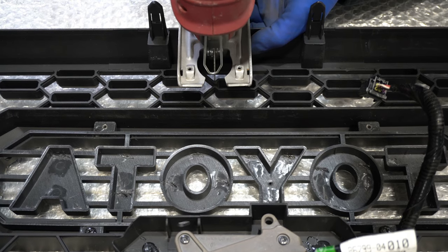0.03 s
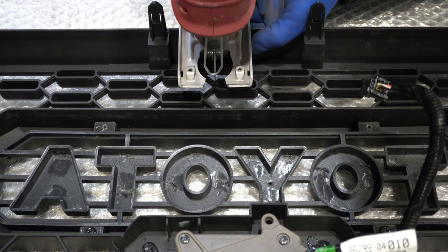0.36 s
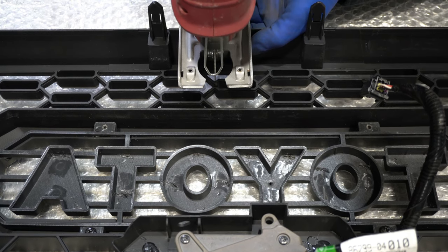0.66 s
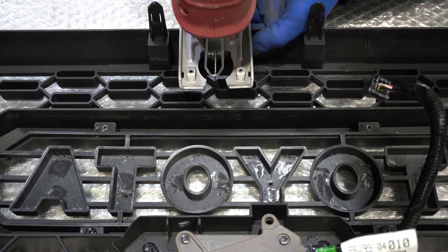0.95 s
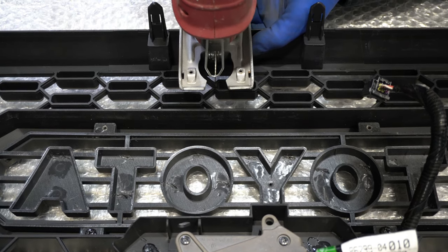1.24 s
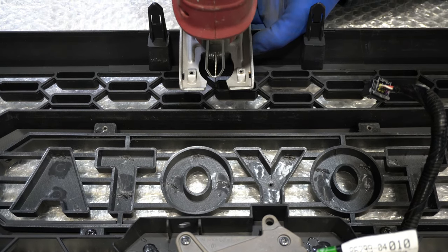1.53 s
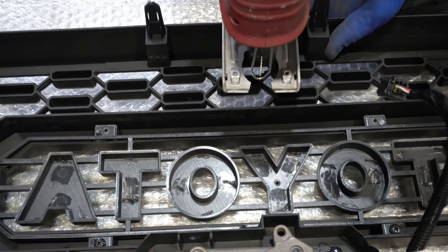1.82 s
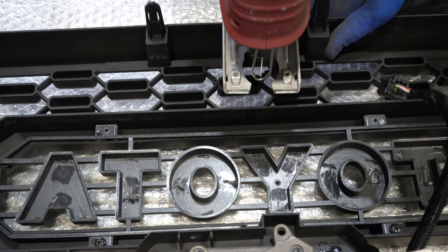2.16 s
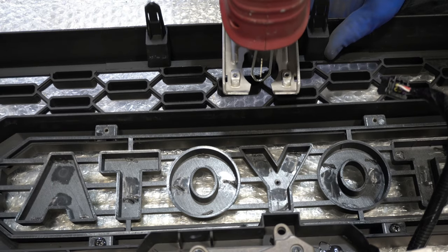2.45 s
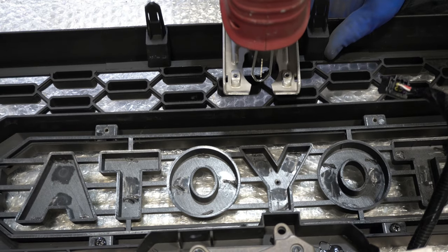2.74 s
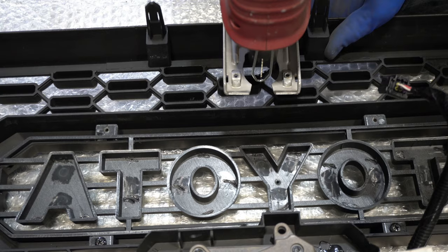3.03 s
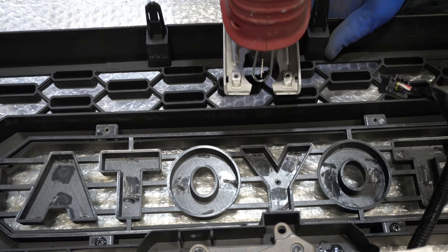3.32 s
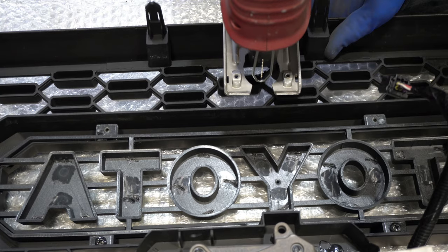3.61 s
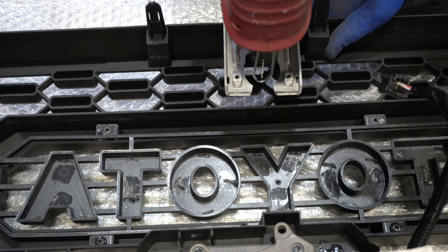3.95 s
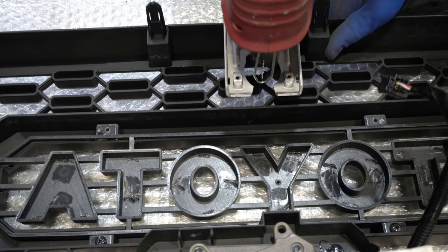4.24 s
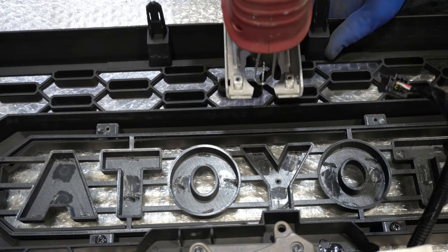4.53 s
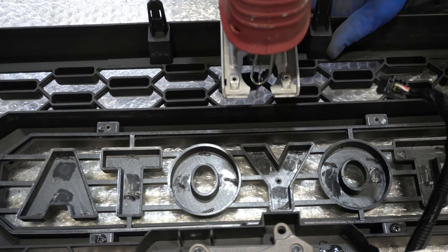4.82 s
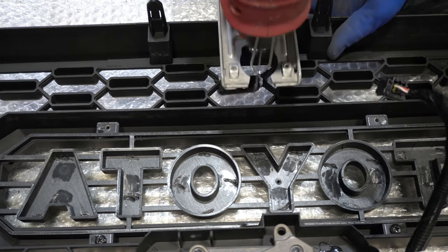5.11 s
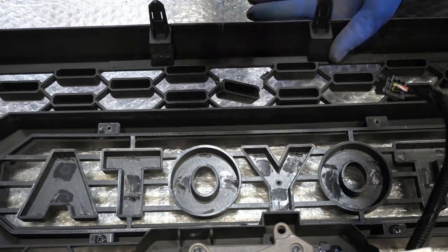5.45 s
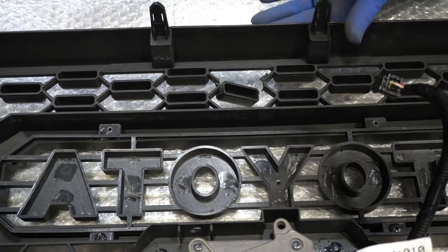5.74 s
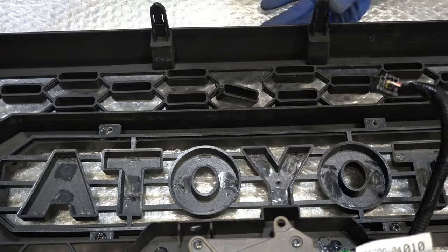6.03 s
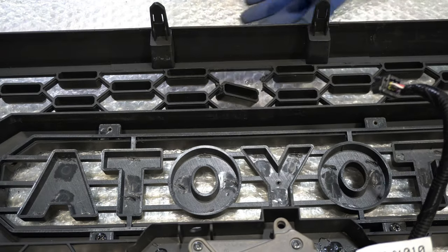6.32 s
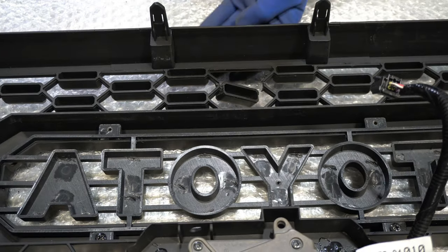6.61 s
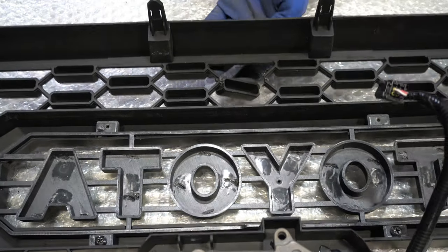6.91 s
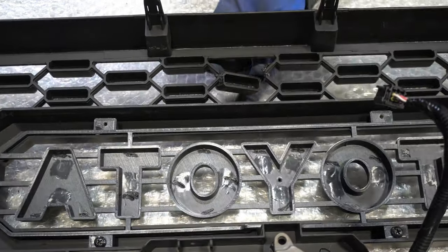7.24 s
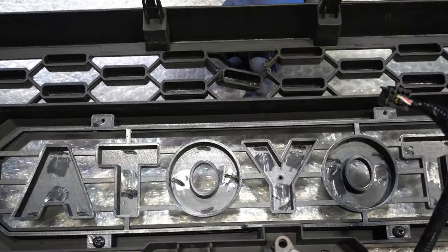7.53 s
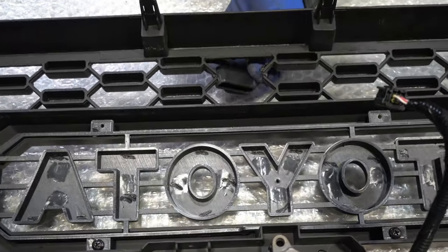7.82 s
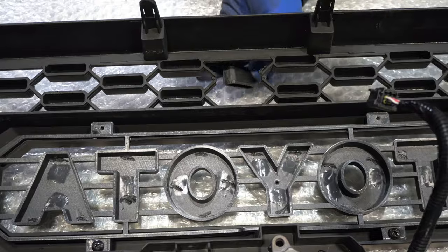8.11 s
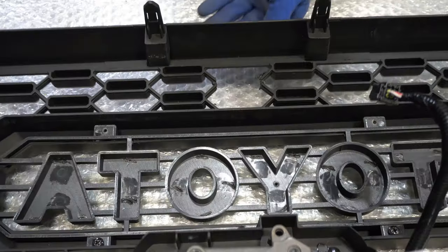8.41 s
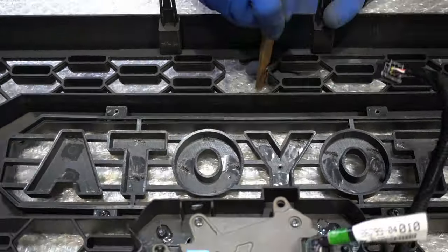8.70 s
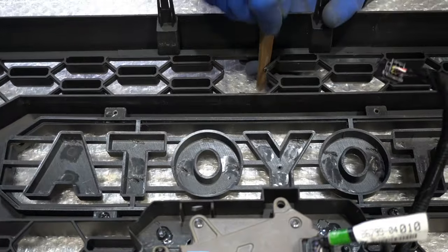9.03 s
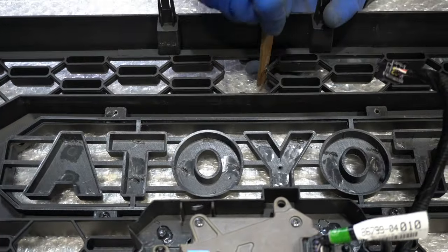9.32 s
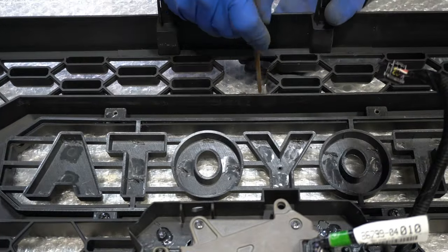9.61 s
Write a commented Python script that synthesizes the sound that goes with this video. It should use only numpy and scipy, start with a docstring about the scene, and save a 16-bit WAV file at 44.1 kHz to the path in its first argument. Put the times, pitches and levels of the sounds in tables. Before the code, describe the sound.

Close up on a workshop bench, a small electric reciprocating saw cuts a plastic grille with a steady motor whine and a fast rattle, hard at first and then more lightly. The blade breaks through, the saw is switched off, and its whirr falls in pitch and fades. A few light plastic clicks follow as the cut piece is picked out, then a hand file scrapes along the edge in quick, chattering catches.

```python
"""On a workshop bench, close by, a small electric reciprocating saw cuts a plastic grille, hard, then lightly.
Periodic tooth contact in the reduction gear makes the motor whine, and play in the blade drive gives
an impact at both ends of each stroke; switched off, the saw coasts down under drag and friction.
The cut piece is picked out with a few clicks, then a hand file chatters along the edge,
exciting the modes of the grille and shaking the bench."""
import sys
import numpy as np
from scipy import signal
from scipy.fft import rfft, irfft
from scipy.io import wavfile
from scipy.ndimage import uniform_filter1d

SR = 44100
rng = np.random.default_rng(int(sys.argv[2]) if len(sys.argv) > 2 else 0)


def int16_out(signal):
    """Quantize to a 16-bit WAV file."""
    q = np.round(np.clip(np.atleast_2d(signal).T, -1, 1) * 32767)
    wavfile.write(sys.argv[1], SR, q.astype(np.int16))


N = 434826
TIME = np.arange(N) / SR
SECOND_CUT_S, BREAKTHROUGH_S, SWITCH_OFF_S, FILING_S = 1.65, 4.62, 4.84, 8.77
MOTOR_TURNS, GEAR_TEETH = 9.25, 37  # per stroke
FREE_HZ = 50.6  # stroke rate at switch-off

# Levels in the tables are relative. Spectra of the room's murmur and the rocking bench: f/Hz, level/dB
WORKSHOP_SPECTRUM = [(20, -1), (50, -1.5), (80, -8), (120, -7.5), (180, -14), (500, -15), (1000, -5),
                     (3000, -21), (8000, -43), (15000, -49)]
BENCH_SPECTRUM = [(4, -8.5), (9, 2), (18, -2.5), (30, -6.5), (55, -18), (100, -33), (200, -50), (400, -101)]
# pushes that rock the bench: hold from t/s, until t/s, level/dB, rise/(dB/s), fall/(dB/s)
BENCH_PUSHES = [(8.3, 8.7, -49, 50, 30), (8.86, 9.2, -27, 170, 30), (9.36, 9.55, -22, 32, 60)]
# modes of the grille: f/Hz, bandwidth/Hz, gain/dB
GRILLE_MODES = [(540, 56, 2.5), (700, 37, 6), (867, 90, 4), (1056, 31, 4.5), (1350, 87, 2.5), (1490, 80, 4),
                (2110, 220, 5), (2800, 290, 6.5), (12800, 1300, -3)]
# spectrum of the filing: f/Hz, level/dB
FILING_SPECTRUM = [(80, -9), (140, -7), (250, -11.5), (430, -13), (620, -4.5), (900, -2), (1500, -6),
                   (2400, -12.5), (3800, -13), (6300, -21), (8500, -26), (10500, -44), (13000, -35),
                   (15500, -48)]
# catches of the file on the edge: t/s, level/dB
FILE_CATCHES = [(8.771, -18), (8.789, -22), (8.809, -18.5), (8.839, -19), (8.858, -17.5), (8.899, -15),
                (8.938, -16.5), (8.96, -18), (8.99, -15.5), (9.023, -15), (9.049, -20), (9.082, -15),
                (9.109, -19), (9.146, -16), (9.179, -20.5), (9.207, -16), (9.229, -21), (9.27, -19.5),
                (9.302, -22), (9.328, -17), (9.395, -19.5), (9.419, -25), (9.441, -18.5), (9.47, -21.5),
                (9.507, -25), (9.559, -18), (9.664, -18), (9.834, -17)]
# clicks of the plastic: t/s, level/dB, centre f/Hz, t60/s, crack level re the ring/dB
PIECE_CLICKS = [(4.619, -16.5, 2520, 0.037, -14), (7.942, -34.5, 1810, 0.11, 4.5),
                (8.034, -43, 2400, .04, -5), (8.298, -35.5, 2460, 0.068, -22), (8.686, -50, 900, 0.11, -13)]
# drumming of the grille in each cut: hold from t/s, until t/s, level/dB, rise/(dB/s), fall/(dB/s)
DRUMMING_SWELLS = [(1.2, 1.5, -28.5, 25, 110), (4.3, 4.58, -50, 0.5, 35)]
# rocking of the saw where it is forced: hold from t/s, until t/s, level/dB, rise/(dB/s), fall/(dB/s)
FORCED_ROCKING = [(1.15, 1.55, -45, 24, 60)]
# gear case resonances that ring as the whirr falls through them: f/Hz, bandwidth/Hz, gain/dB
GEAR_CASE_MODES = [(3260, 170, 7.5), (2200, 160, 5.5)]
# whistles of the coasting rotor: multiple of the stroke rate, peak t/s, half-width/s, level/dB
ROTOR_WHISTLES = [(222, 5.92, .21, -42), (443, 6.67, .08, -50), (444, 6.95, .09, -57), (443, 7.17, .1, -60)]
# tones of the drive: multiple of the stroke rate, first cut level/dB, second cut level/dB
DRIVE_TONES = [(2, -55, -59), (3, -46, -50.5), (4, -36.5, -52.5), (5, -49, -55), (9.25, -27.5, -39),
               (10.06, -38, -50), (11.06, -38, -45), (18.5, -38, -47), (19.12, -33, -43), (20.12, -30, -46),
               (24.12, -43, -42), (27.75, -31.5, -41), (42.25, -33, -47), (44.25, -32.5, -44),
               (48.25, -36, -41), (50.25, -37, -41), (92.5, -39, -35.5), (111, -43, -39),
               (138.75, -31, -50)]
# pitch of the gear whine, climbing in the hard cut: t/s, f/Hz
FIRST_CUT_MESH = [(0.02, 1848), (0.274, 1882), (0.62, 1903), (1.2, 1902), (1.62, 1892)]
# pitch of the gear whine, lower in the light cut and rising once the blade is through: t/s, f/Hz
SECOND_CUT_MESH = [(1.68, 1837), (3.14, 1838), (4.6, 1850), (4.83, 1882)]
# resonances of the saw's housing: f/Hz, bandwidth/Hz, gain/dB
HOUSING_MODES = [(656, 67, 2.5), (920, 120, 1), (1326, 350, 2.5), (1526, 110, 2.5), (2140, 130, 1),
                 (3170, 1900, 1.5), (4770, 630, 2.5), (7200, 560, 5), (8400, 1430, 6.5),
                 (10530, 1860, -5.5), (12100, 520, 3.5)]
# spectra of the rattle while pressing hard, cutting lightly and coasting: f/Hz, level/dB
HARD_SPECTRUM = [(88, -36), (150, -28), (205, -22), (332, -15), (471, -7), (540, -9.5), (877, -7.5),
                 (1000, -5.5), (1760, -7.5), (1940, -3.5), (5990, -10), (7130, -14), (10100, -19),
                 (13000, -21), (15500, -28.5)]
LIGHT_SPECTRUM = [(88, -38), (150, -27), (320, -16), (453, -9.5), (583, -10.5), (827, -6.5), (1730, -8.5),
                  (1870, -5.5), (1980, -5.5), (4650, -8), (5870, -14), (8170, -16.5), (9920, -20.5),
                  (12300, -19.5), (15500, -29.5)]
COASTING_SPECTRUM = [(120, -79), (200, -24), (454, -10.5), (653, -3.5), (1150, -2.5), (1560, -1),
                     (1840, -2), (2060, -0.5), (2750, -4), (3120, 0.5), (4660, -8.5), (5390, -14.5),
                     (8660, -20), (10600, -18.5), (15500, -33)]


def undb(db):
    """Amplitude ratio of a level in decibels."""
    return 10 ** (np.asarray(db) / 20)


def unit(x):
    """Normalisation to rms 1."""
    return x / np.sqrt(np.mean(x ** 2))


def fade(start, length):
    """Linear ramp from 0 to 1."""
    return np.clip((TIME - start) / length, 0, 1)


def since(start):
    """Time elapsed after an onset, zero before it."""
    return np.maximum(TIME - start, 0)


def bump(at, half_width_s):
    """Gaussian envelope with peak 1."""
    return np.exp(-((TIME - at) / half_width_s) ** 2)


def swells(rows):
    """Power sum of envelopes that grow exponentially, hold and decay."""
    return np.sqrt(sum(undb(db - rise * np.maximum(start - TIME, 0) - fall * since(end)) ** 2
                       for start, end, db, rise, fall in rows))


def by_cut(hard, light):
    """Crossfade from the hard first cut's value to the light second cut's."""
    return hard + (light - hard) * fade(SECOND_CUT_S, 0.0028)


def noise():
    """Gaussian white noise."""
    return rng.standard_normal(N)


def walk(rate_hz):
    """Linearly interpolated random fluctuation of rms 1."""
    step = int(SR / rate_hz)
    return unit(uniform_filter1d(np.repeat(rng.standard_normal(N // step + 1), step), step)[:N])


def grains(rate, spread_db):
    """Shot noise: tiny impacts of uneven size, at a mean rate per second."""
    impulses = (rng.random(N) < rate / SR) * np.sign(noise())
    return unit(impulses * undb(spread_db * np.clip(noise(), -2, 2)))


def band(x, hz, width_hz):
    """Second-order resonator, gain 1 at its centre."""
    return signal.lfilter(*signal.iirpeak(hz, hz / width_hz, fs=SR), x)


def body(x, spectrum, modes=(), size=8192):
    """Minimum-phase response with a given spectrum and modes; it keeps the power of white input."""
    f = np.arange(size // 2 + 1) * SR / size
    hz, db = np.transpose(spectrum)
    db = np.interp(np.log(f + 1), np.log(hz), db)
    for centre, width, lift in modes:
        db = db + lift / (1 + (2 * (f - centre) / width) ** 2)
    cepstrum = irfft(np.log(undb(db)))[:size // 2]
    cepstrum[1:] *= 2  # folding the cepstrum makes the response causal
    response = irfft(np.exp(rfft(cepstrum, size)))
    return signal.fftconvolve(x, response / np.linalg.norm(response))[:N]


def workshop():
    """Ambient noise: a faint steady rush."""
    return undb(-54) * body(noise(), WORKSHOP_SPECTRUM)


def room(x, t60, wet_db):
    """Reverberation: dense reflections from bench and walls follow the direct sound and decay."""
    t = TIME[:SR // 2]
    tail = rng.standard_normal(len(t)) * undb(-60 * t / t60) * (t > .003)
    tail = signal.lfilter(*signal.butter(1, 6000, fs=SR), tail)
    return x + undb(wet_db) * signal.fftconvolve(x, tail / np.linalg.norm(tail))[:N]


def bench():
    """Forced vibration: handling rocks the bench at very low frequencies."""
    return body(noise(), BENCH_SPECTRUM, size=32768) * swells(BENCH_PUSHES)


def glove():
    """Friction noise: the glove brushes the grille as it draws the piece away."""
    envelope = undb(-62 + 3.3 * walk(40)) * bump(at=8.52, half_width_s=0.14)
    return envelope * unit(band(grains(rate=2500, spread_db=7), hz=7500, width_hz=5000))


def loose_piece():
    """Impact and friction: the cut piece snaps, ticks and squeaks, exciting the grille's modes."""
    out = np.zeros(N)
    for at, db, hz, t60, crack_db in PIECE_CLICKS:
        age = since(at)
        spectrum = [(0.31 * hz, -16), (0.41 * hz, -6), (hz, 0),
                    (1.2 * hz, -4), (2.6 * hz, -15), (6 * hz, -30)]
        ring = body(noise(), spectrum) * undb(-60 * age / t60)
        crack = undb(crack_db) * np.exp(-age / 0.0043) * unit(band(noise(), hz=3900, width_hz=5500))
        out += undb(db + 1) * fade(at, 0.0011) * (ring + crack)
    squeak = unit(band(grains(rate=1700, spread_db=0), hz=1980, width_hz=300))
    out += undb(-48.5) * bump(at=8.42, half_width_s=.028) * squeak
    return body(out, [(150, -14), (500, 13.0), (9000, 6.5), (15000, -11)], GRILLE_MODES)


def filing():
    """Stick-slip friction: the file's teeth catch on the plastic edge in bursts and drag in between."""
    attack_s, hold_s, release_s = .005, 0.0094, 0.0097
    catch_power = np.zeros(N)
    for at, db in FILE_CATCHES:
        release = np.exp(-since(at + hold_s) / release_s)
        catch_power += (undb(db - 9.5) * fade(at - attack_s / 2, attack_s) * release) ** 2
    drag_db = -34 - 3 * since(FILING_S) - 14 * fade(9.6, 0.026)  # ever lighter, then eased off
    drag = undb(drag_db + 2 * walk(54)) * fade(FILING_S, 0.0017)
    force = np.sqrt(catch_power + drag ** 2)
    # the teeth bite brighter at the height of a catch
    teeth = unit(band(grains(rate=3500, spread_db=13), hz=4100, width_hz=3700))
    bite = undb(-20) * np.sqrt(catch_power) * teeth
    # fine chips break off with tiny dry ticks
    ticks = band(grains(rate=600, spread_db=12), hz=12500, width_hz=5000)
    chips = undb(-31) * force * unit(band(ticks, hz=12500, width_hz=4500))
    scrape = body(force * grains(rate=8000, spread_db=3.5), FILING_SPECTRUM, GRILLE_MODES)
    return scrape + bite + chips


def stroke_rate():
    """Strokes per second: held by the motor, then run down by viscous drag and dry friction."""
    drag_s, friction_hz_per_s = 2.32, 3.04
    mesh_hz = np.interp(TIME, *np.transpose(list(FIRST_CUT_MESH) + list(SECOND_CUT_MESH)))
    friction_hz = friction_hz_per_s * drag_s
    coasting = (FREE_HZ + friction_hz) * np.exp(-since(SWITCH_OFF_S) / drag_s) - friction_hz
    return np.where(TIME < SWITCH_OFF_S, mesh_hz / GEAR_TEETH, np.maximum(coasting, 0))


def speed_ratio(speed):
    """Coasting speed relative to that at switch-off; 1 under power."""
    return np.where(TIME < SWITCH_OFF_S, 1, speed / FREE_HZ)


def reversals(strokes, speed, ring_s, scatter_db, return_db):
    """Impact envelope at both ends of each stroke: the play closes quickly, then the vibration decays."""
    knock = np.floor(2 * strokes).astype(int)
    knock -= knock.min()
    count = knock.max() + 1
    scatter = np.clip(rng.standard_normal(count), -2, 2)
    size = undb(scatter_db * scatter + return_db * (np.arange(count) % 2))
    age = (2 * strokes % 1) / (2 * speed + 1e-3)
    return 1.6 * size[knock] * (1 - np.exp(-age / 0.00076)) * np.exp(-age / ring_s)


def whirr(strokes, multiple, width_hz):
    """Narrow-band noise: a rough tone at a multiple of the stroke rate."""
    angle = 2 * np.pi * multiple * strokes
    return walk(width_hz) * np.cos(angle) + walk(width_hz) * np.sin(angle)


def drumming(strokes):
    """Periodic impact: each pull of the blade slaps the grille against the saw's shoe."""
    slaps = np.diff(np.floor(strokes), prepend=np.floor(strokes[0])) * undb(3.1 * walk(50))
    spectrum = [(60, -17), (110, -15.5), (190, -3.5), (330, -2), (600, -2), (1000, -11), (2500, -40)]
    thud = body(slaps, spectrum)
    return thud / np.std(thud[:SR]) * swells(DRUMMING_SWELLS)


def blade_ring(strokes, speed):
    """Free vibration: pressed hard in the first cut, the blade pings at its reversals."""
    ring_hz = 7170
    pings = reversals(strokes, speed, ring_s=0.0022, scatter_db=-2.5, return_db=-9)
    ring = np.sin(2 * np.pi * ring_hz * TIME + 1.5 * walk(120))
    return undb(-15.5) * (1 - fade(SECOND_CUT_S, .004)) * pings * ring


def bearings(strokes, speed):
    """Rolling contact: the unloaded bearings whirr, jolted by each reversal, and the rotor whistles."""
    settle_hz = 28.1  # stroke rate below which the whirr dies quickly
    jolts = 0.59 + 0.72 * reversals(strokes, speed, ring_s=0.003, scatter_db=2.0, return_db=6)
    gain = undb(-30.5) * fade(BREAKTHROUGH_S, .8) * np.minimum(speed / settle_hz, 1) ** 9.1
    narrow = whirr(strokes, multiple=93, width_hz=250)
    broad = whirr(strokes, multiple=97, width_hz=1100)
    rolling = gain * jolts * (0.65 * narrow + 0.74 * broad)
    out = rolling + sum(undb(db) * band(rolling, hz, width) for hz, width, db in GEAR_CASE_MODES)
    for multiple, at, half_width_s, db in ROTOR_WHISTLES:
        out += undb(db) * bump(at, half_width_s) * whirr(strokes, multiple, width_hz=77)
    return out


def whine(strokes, speed):
    """Periodic forcing: stroke shake, fan, gear mesh and imbalance give tones locked to the shaft."""
    flutter_hz, mesh_lost_hz = 10.1, 35
    ratio, through = speed_ratio(speed), fade(BREAKTHROUGH_S, 0.026)
    angle = 2 * np.pi * (strokes + 0.00024 * walk(40))
    # the saw's body shakes at the stroke rate, building up as the shoe is pressed down
    sway = undb(-36.5 - 6.6 * through) * fade(0, 0.52) + swells(FORCED_ROCKING)
    tones = sway * np.sin(angle)
    bite_db = -4 * (1 - fade(0, 0.95))  # the tones grow as the blade bites
    for multiple, first_db, second_db in DRIVE_TONES:
        wander_db = 1.3 * min(multiple / 30, 1) * walk(20)
        db = by_cut(first_db, second_db) + wander_db + bite_db
        if multiple <= MOTOR_TURNS:  # the grille radiates the low tones until the blade is through
            db = db - 11 * through
        tones = tones + undb(db) * np.cos(multiple * angle)
    flutter_db = np.sin(2 * np.pi * flutter_hz * TIME + .8 * walk(3)) + 0.51 * walk(40)
    mesh = undb(by_cut(-24, -25.5) + flutter_db) * ratio ** 2.8 * np.sin(GEAR_TEETH * angle)
    mesh *= np.minimum(speed / mesh_lost_hz, 1) ** 12
    hum = whirr(strokes, MOTOR_TURNS, width_hz=45)
    imbalance = undb(-43) * fade(SWITCH_OFF_S, 0.24) * ratio ** 3.4 * hum
    return np.sqrt(2) * (tones * ratio ** 7 + mesh + imbalance)


def rattle(strokes, speed):
    """Backlash: knocks of the blade drive, over a chatter of teeth and brushes, ring the housing."""
    ratio, coast, loose = speed_ratio(speed), fade(5.4, 1.25), fade(BREAKTHROUGH_S, 1)
    # the knocks stand out more once the blade is free, and soften as it slows
    knock_db = by_cut(6, 2.4) * (1 - loose) + 12 * loose
    impacts = reversals(strokes, speed, ring_s=0.0024, scatter_db=1.0, return_db=-1.0)
    knocks = undb(knock_db) * ratio ** 0.21 * impacts
    chatter = grains(rate=9000, spread_db=3.5)
    running_rms = np.sqrt(uniform_filter1d(1 + knocks ** 2, size=8000))
    blows = (chatter + knocks * grains(rate=14000, spread_db=1.0)) / running_rms
    hard = undb(-14.5) * body(blows, HARD_SPECTRUM, HOUSING_MODES)
    light = undb(-17.5) * body(blows, LIGHT_SPECTRUM, HOUSING_MODES)
    free = undb(-18.5) * body(blows, COASTING_SPECTRUM, HOUSING_MODES)
    nearness = undb(1.5 * bump(at=5.82, half_width_s=0.36))  # lifted out, it swings past the listener
    return by_cut(hard, (1 - coast) * light + coast * free) * nearness * ratio ** 1.72


def scene():
    """Superposition of saw, loose piece and file; the whine and the background bypass the reverberation."""
    speed = stroke_rate()
    strokes = np.cumsum(speed) / SR
    strokes -= np.interp(6.256, TIME, strokes)  # a reversal falls at this time
    saw = rattle(strokes, speed) + bearings(strokes, speed) + blade_ring(strokes, speed)
    near = saw + drumming(strokes) + loose_piece() + glove() + filing()
    return (room(near, t60=0.25, wet_db=-16.5) + whine(strokes, speed) + bench() + workshop())[None]


def record(dry):
    """Clipping limits the highest peaks and a steep low-pass filter removes the top of the treble."""
    top_hz = 15850
    lowpass = signal.ellip(10, .2, 80, top_hz, fs=SR, output="sos")
    return signal.sosfilt(lowpass, np.clip(dry, -.92, .92))


dry = scene()
out = record(dry)
int16_out(out)
```